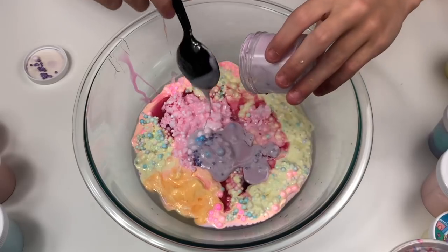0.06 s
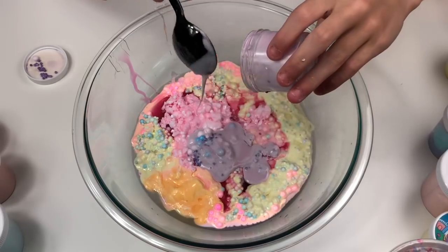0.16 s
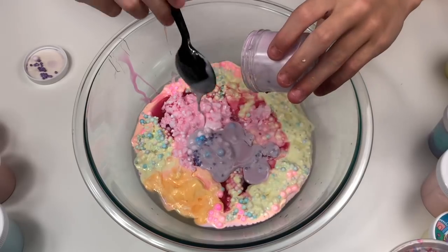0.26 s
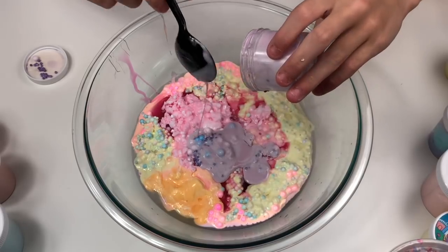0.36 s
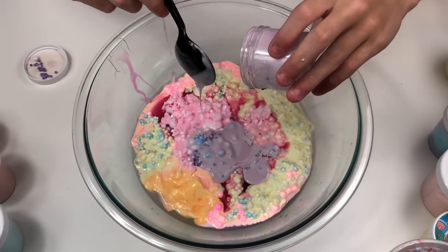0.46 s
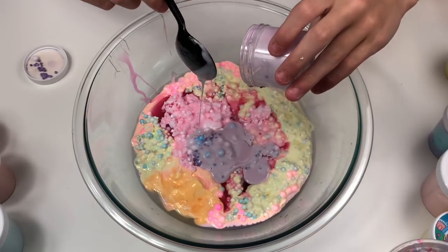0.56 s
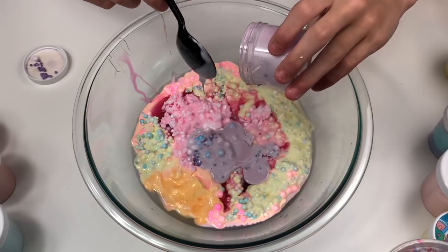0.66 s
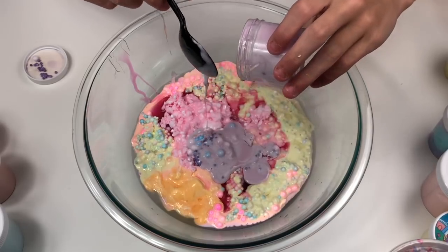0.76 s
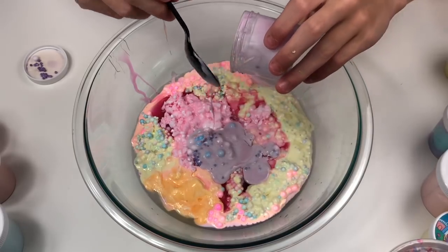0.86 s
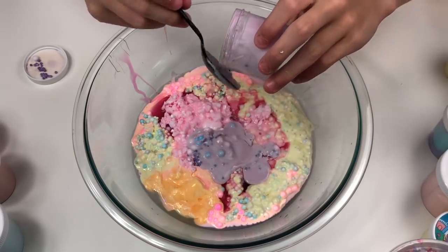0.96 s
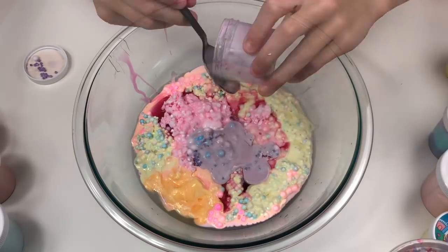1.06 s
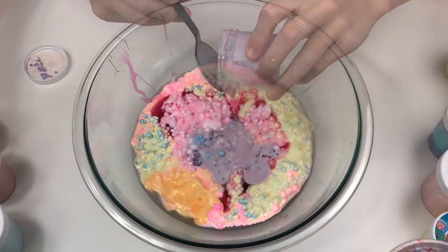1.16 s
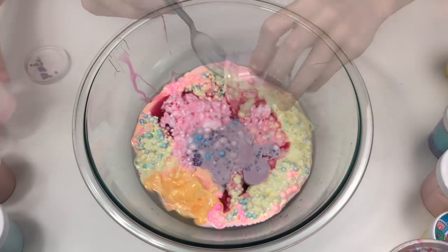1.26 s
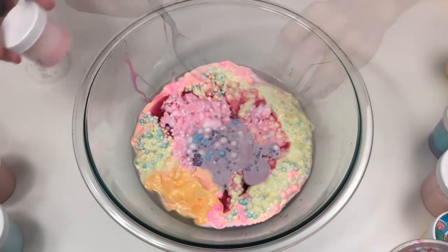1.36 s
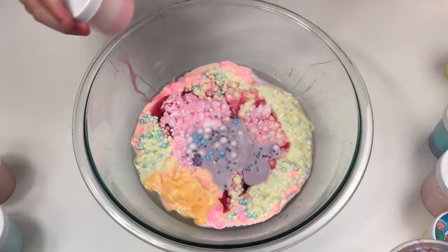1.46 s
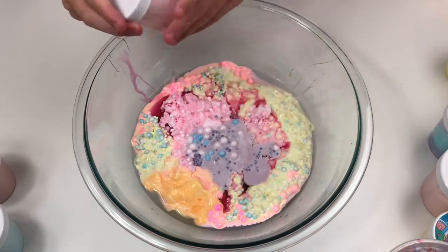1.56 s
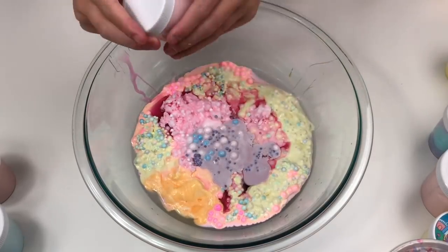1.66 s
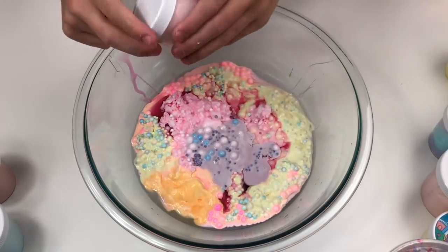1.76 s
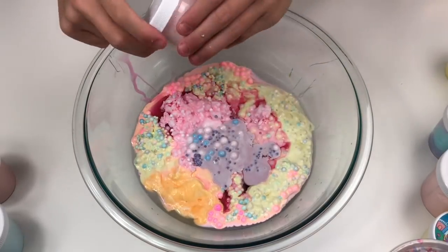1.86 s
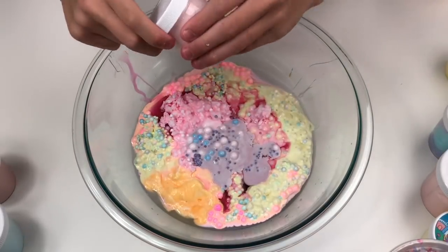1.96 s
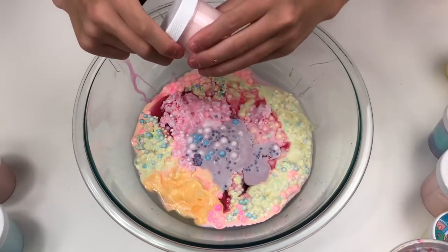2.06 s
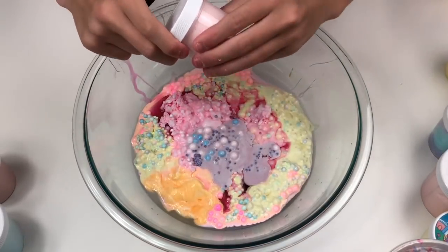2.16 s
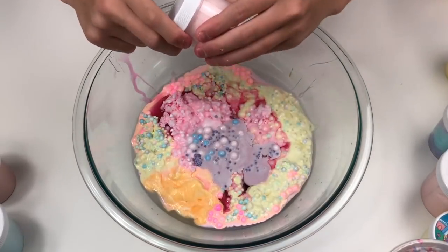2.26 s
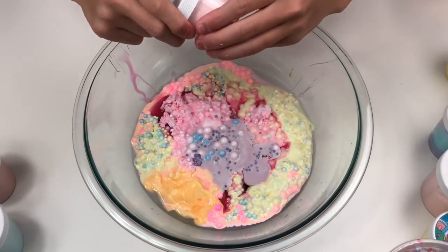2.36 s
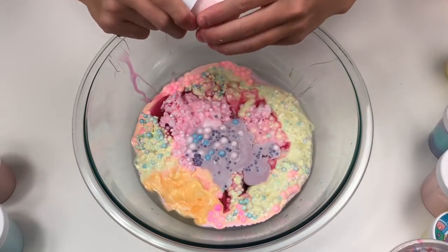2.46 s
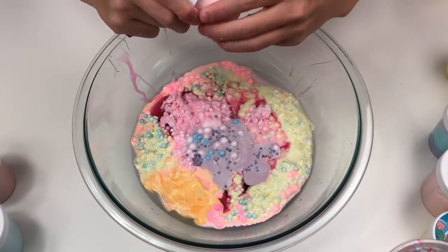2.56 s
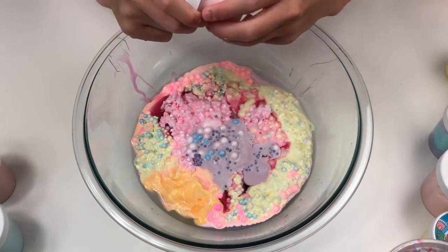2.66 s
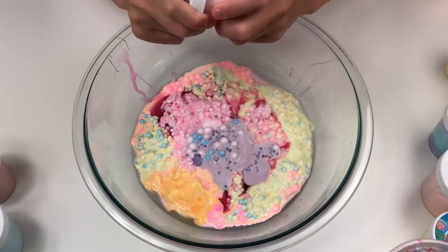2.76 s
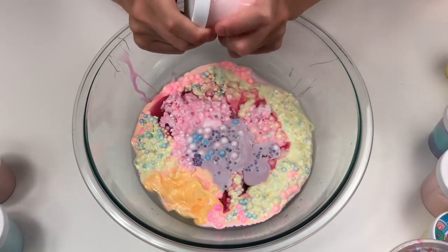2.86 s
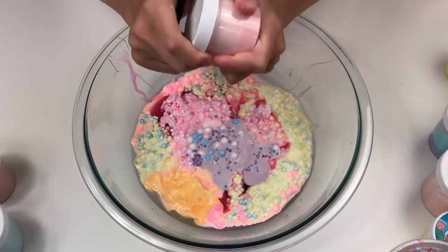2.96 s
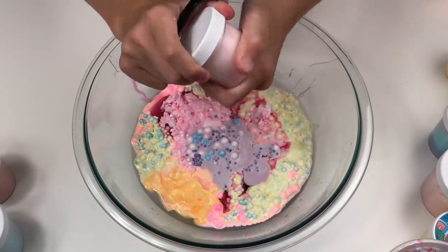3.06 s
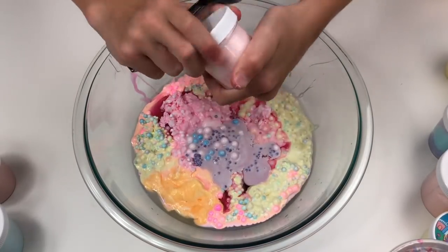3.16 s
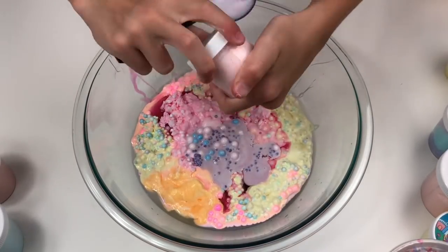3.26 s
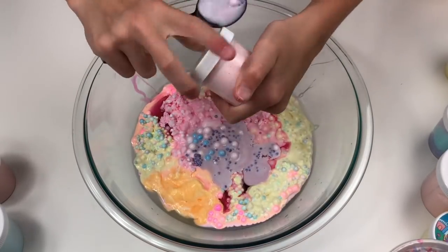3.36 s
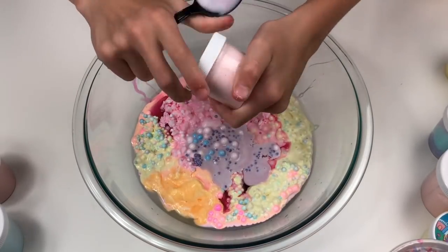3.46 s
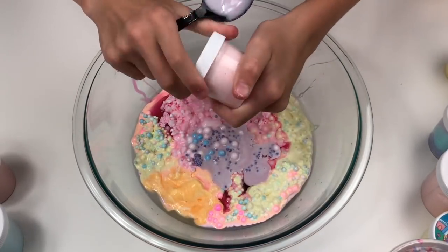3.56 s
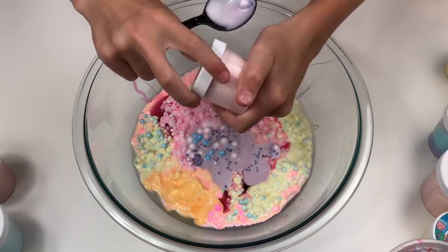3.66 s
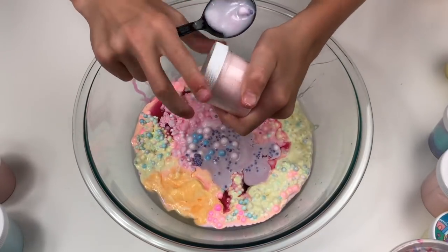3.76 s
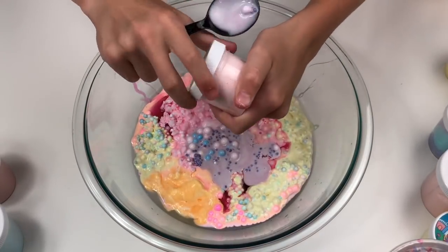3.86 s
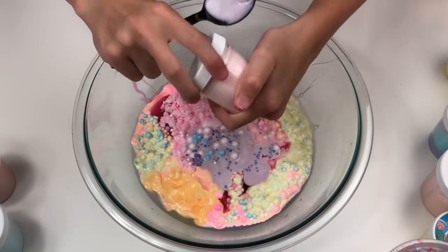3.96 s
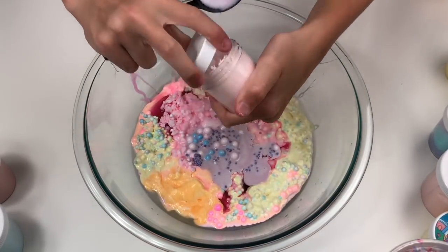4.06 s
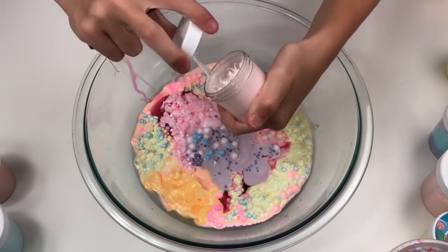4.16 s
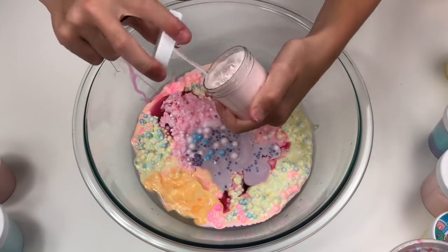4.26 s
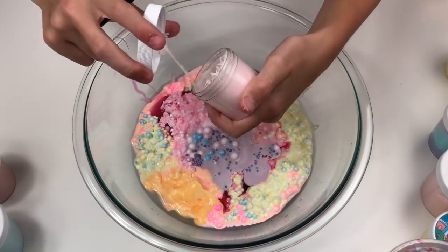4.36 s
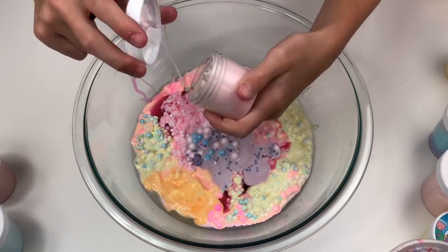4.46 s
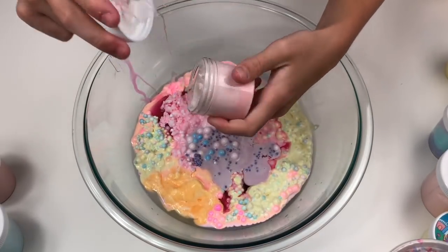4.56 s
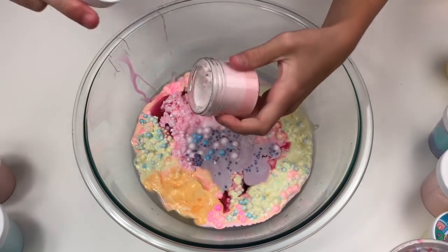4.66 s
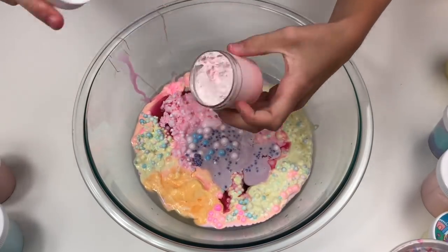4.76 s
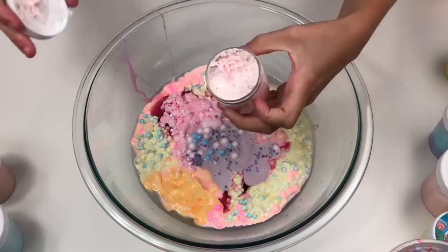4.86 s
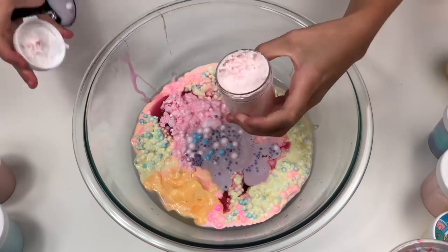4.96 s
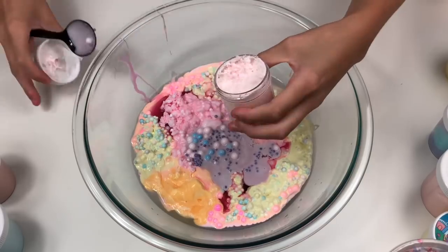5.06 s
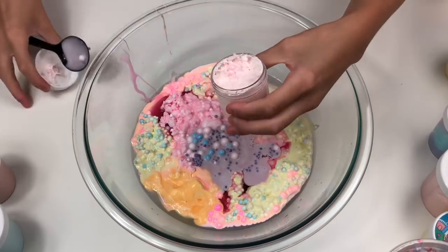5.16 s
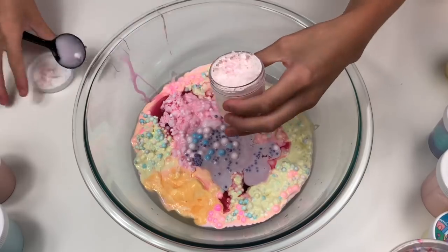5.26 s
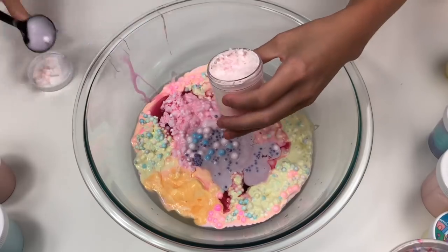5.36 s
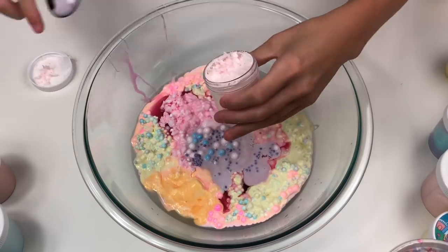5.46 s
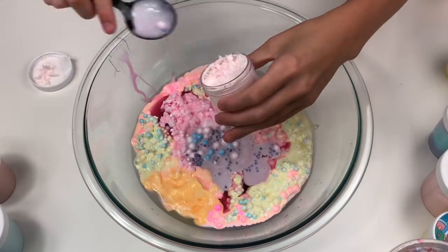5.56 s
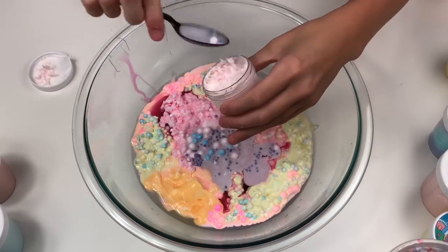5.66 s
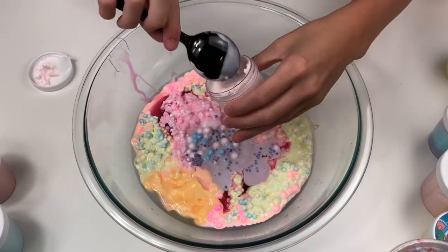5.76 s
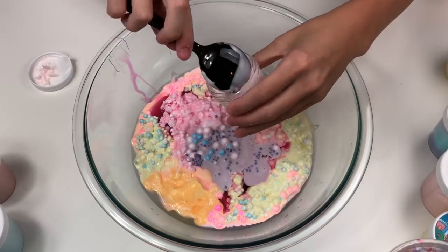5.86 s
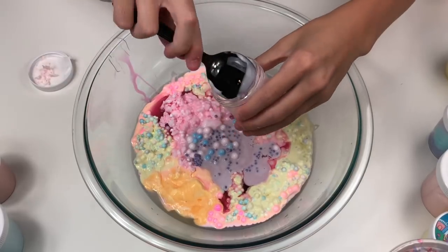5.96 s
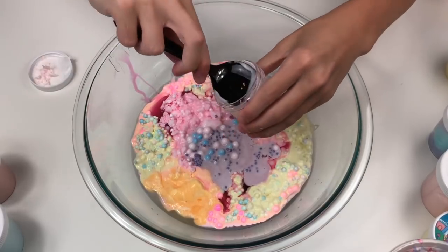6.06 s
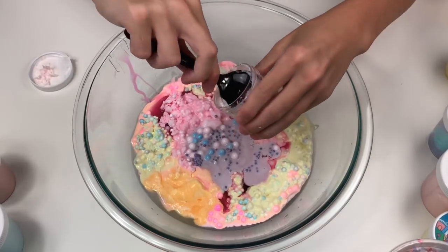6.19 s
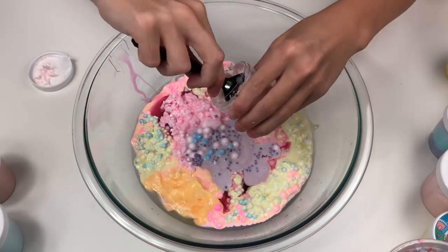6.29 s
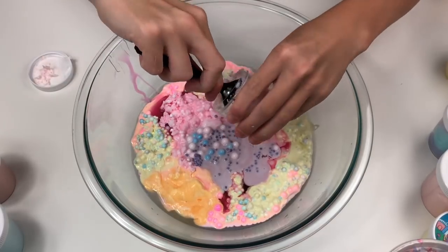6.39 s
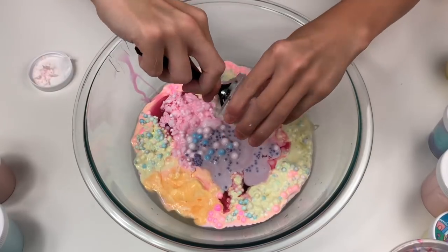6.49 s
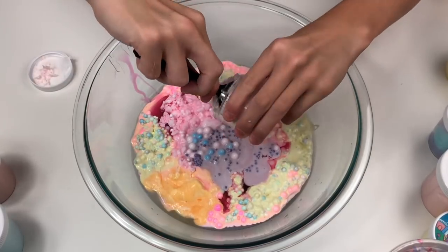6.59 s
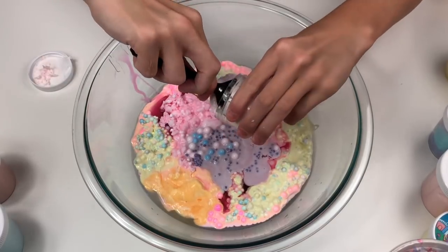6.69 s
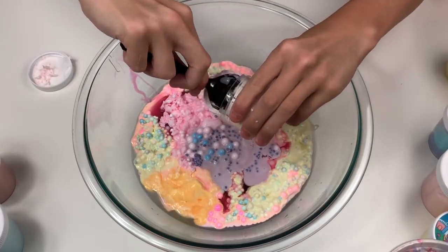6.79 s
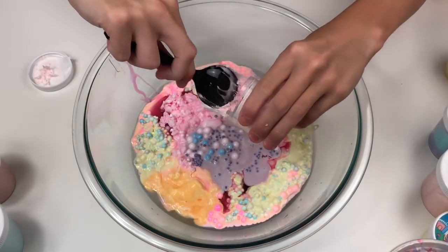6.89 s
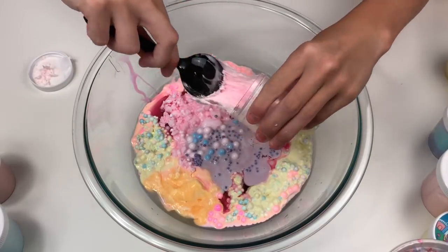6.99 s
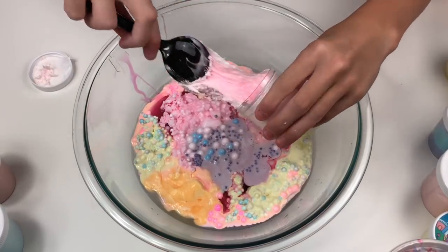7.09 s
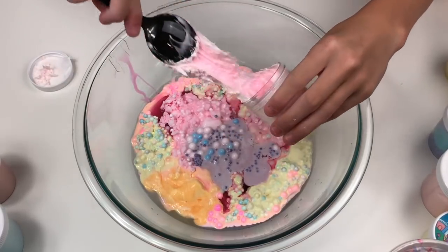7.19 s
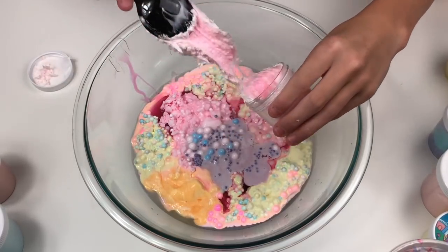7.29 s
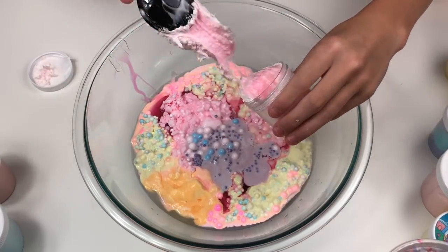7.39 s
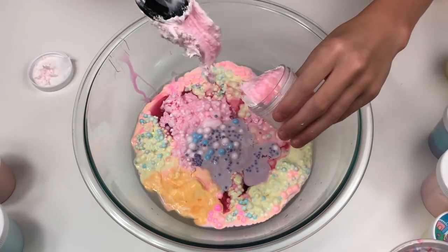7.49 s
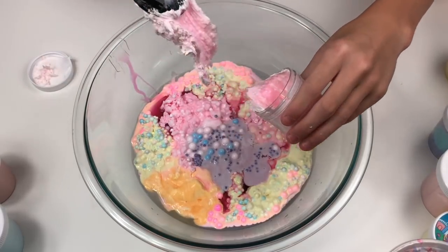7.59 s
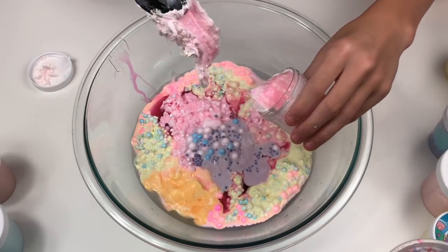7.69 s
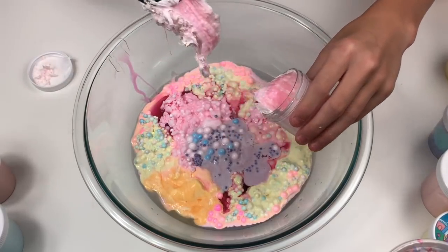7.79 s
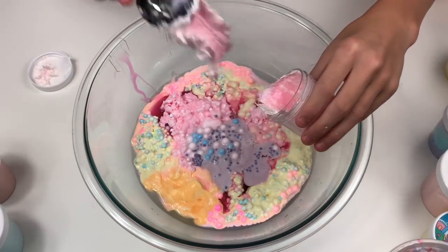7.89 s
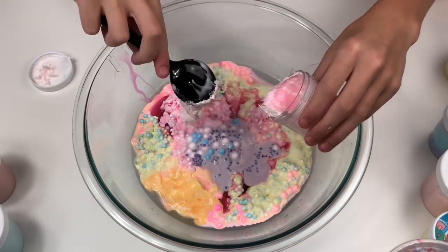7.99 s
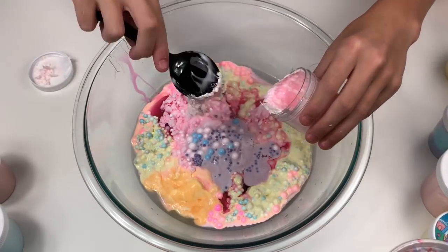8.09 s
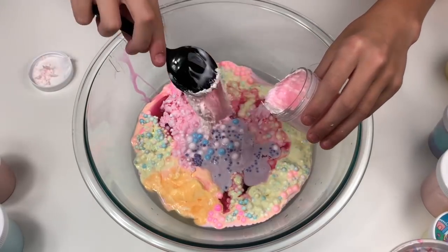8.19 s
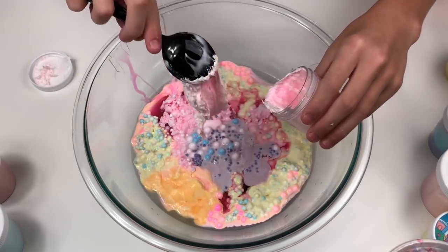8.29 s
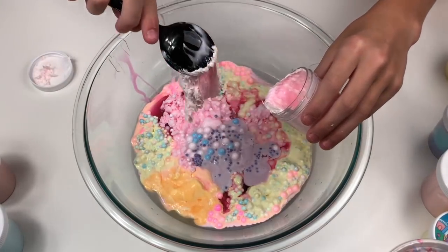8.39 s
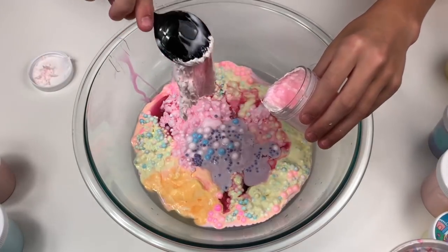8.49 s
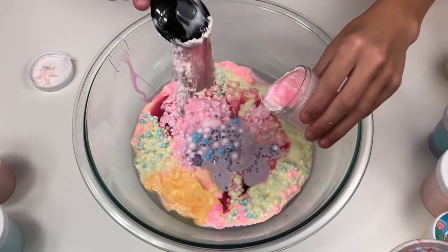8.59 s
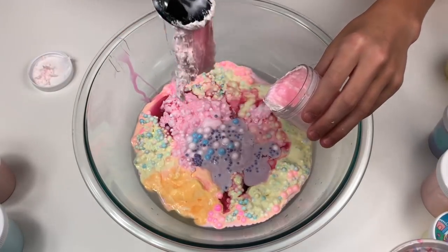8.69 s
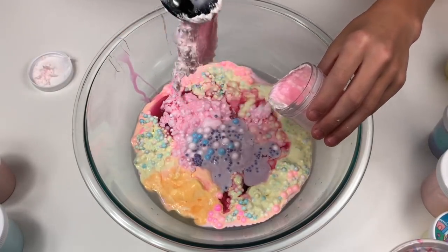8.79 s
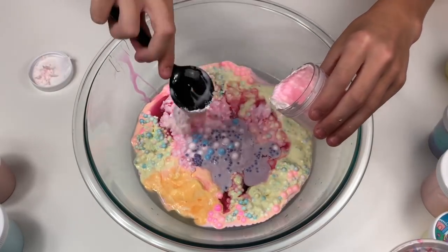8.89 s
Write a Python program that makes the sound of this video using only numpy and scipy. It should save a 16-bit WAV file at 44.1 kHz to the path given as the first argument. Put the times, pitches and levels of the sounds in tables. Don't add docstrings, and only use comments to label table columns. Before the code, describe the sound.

Close, quiet plastic taps and sharp lid snaps, rubbing threads, a lid dropping with two bounces, then wet slime popping, fizzing and hissing.

```python
import sys
import numpy as np
from scipy import signal
from scipy.fft import rfft, irfft
from scipy.io import wavfile
from scipy.ndimage import uniform_filter1d

SR = 44100
rng = np.random.default_rng(int(sys.argv[2]) if len(sys.argv) > 2 else 0)


def boost_factor(decibels):
    exponent = np.asarray(decibels, float) / 20
    return 10 ** exponent


def generate_wav(sig):
    pcm = np.round(np.clip(np.atleast_2d(sig).T, -1, 1) * 32767).astype(np.int16)
    wavfile.write(sys.argv[1], SR, pcm)


N = 394254
AGE = np.arange(6000) / SR


def rms_one(x):
    return x / np.sqrt(np.mean(x ** 2) + 1e-30)


def filtered(x, hz, kind="low", order=2):
    return signal.sosfilt(signal.butter(order, hz, kind, fs=SR, output="sos"), x)


def at_hz(points, hz):
    points = np.array(points)
    return np.interp(np.log(hz), np.log(points[:, 0]), points[:, 1])


def coloured(x, spectrum):
    hz = np.maximum(np.fft.rfftfreq(len(x), 1 / SR), 1)
    return rms_one(irfft(rfft(x) * boost_factor(at_hz(spectrum, hz)), len(x)))


def resonance(x, hz, width_hz):
    r = np.exp(-np.pi * width_hz / SR)
    poles = [1, -2 * r * np.cos(2 * np.pi * hz / SR), r * r]
    return signal.lfilter([(1 - r * r) / 2, 0, (r * r - 1) / 2], poles, x)


def twice_resonant(x, hz, width_hz):
    return resonance(resonance(x, hz, width_hz), hz, width_hz)


def grains(per_s, spread_db):
    sizes = boost_factor(spread_db * np.minimum(rng.exponential(1, N), 4)) * rng.standard_normal(N)
    return sizes * (rng.random(N) < per_s / SR)


def add(out, s, sound):
    at = round(s * SR)
    out[at:at + len(sound)] += sound[:N - at]


def strokes(rows):
    s, peak_db, rise, fall = np.transpose([row[:4] for row in rows])[:, :, None]
    since = np.arange(0, N, 32) / SR - s
    return boost_factor(peak_db + 20 * np.minimum(since / rise, -since / fall))


def joined(gains):
    return np.interp(np.arange(N) / 32, np.arange(gains.shape[1]), gains.sum(axis=0))


def crack(noise, hz, t60, width, flat_db, spike):
    burst = noise * boost_factor(-60 * AGE / t60) * (1 - np.exp(-AGE / (0.0037 * t60)))
    burst[1] += spike
    base = filtered(burst, 2400, "high")
    sound = resonance(base, hz, width * hz) + boost_factor(flat_db) * base
    return sound / np.max(np.abs(sound))


def blows(events, modes, spread_db, rise_s, flat_db, crack_t60, ring, split_hz=1000, swell_cycles=1e-6):
    out = np.zeros(N)
    hz, db, t60 = np.transpose(modes)[:, :, None]
    signs = (-1.) ** np.arange(len(modes))[:, None]
    rings = signs * np.sin(2 * np.pi * hz * AGE) * boost_factor(db - 60 * AGE / (ring * t60))
    rings *= 1 - np.exp(-AGE / rise_s)
    rings *= np.minimum(AGE * hz / swell_cycles, 1) ** 2
    is_low = hz[:, 0] < split_hz
    for s, peak_db, crack_db, crack_hz, low_db in events:
        strengths_db = spread_db * rng.standard_normal(len(modes)) + low_db * is_low
        body = boost_factor(strengths_db) @ rings
        body = body / np.max(np.abs(body))
        noise = rng.standard_normal(len(AGE))
        edge = boost_factor(crack_db) * crack(noise, crack_hz, crack_t60, 0.451, flat_db, spike=3.934)
        add(out, s, boost_factor(peak_db) * (body + edge))
    return out


def snaps(events, width, flat_db, gain_db, spike):
    out = np.zeros(N)
    for s, peak_db, hz, t60, dull_db in events:
        bright, dull = rng.standard_normal((2, len(AGE)))
        push = twice_resonant(dull * boost_factor(-60 * AGE / (1.2 * t60)), 1100, 2600)
        sound = crack(bright, hz, t60, width, flat_db, spike) + boost_factor(dull_db) * push / np.max(np.abs(push))
        add(out, s, boost_factor(peak_db + gain_db) * sound)
    return out


def films(events, t60, dull_db, dull_db_per_octave):
    return [(s, db, hz, t60, dull_db + dull_db_per_octave * np.log2(hz / 6000)) for s, db, hz in events]


def pings(events, swell_cycles):
    out = np.zeros(N)
    for s, db, hz, t60 in events:
        swell = np.minimum(AGE * hz / swell_cycles, 1) ** 2
        add(out, s, boost_factor(db - 60 * AGE / t60) * swell * np.sin(2 * np.pi * hz * AGE))
    return out


# pitch_hz, width_hz, level_db
HUMS = [(64.5, 29, -4.5), (128.6, 34.3, -1.5), (188.6, 29, -8.5), (285, 81, -13)]


def rumble():
    out = np.zeros(N)
    lumps_db, lumps_per_s = 3, 4.7
    for hz, width_hz, db in HUMS:
        knots = rng.standard_normal(80)
        swell_db = lumps_db * np.interp(np.arange(N) / SR * lumps_per_s, np.arange(80), knots)
        out += boost_factor(db + swell_db) * rms_one(twice_resonant(rng.standard_normal(N), hz, width_hz))
    return boost_factor(-74.5) * out


# pitch_hz, level_db (per Hz)
FLOOR = [(18, -37.5), (56, -4.5), (189, -6.5), (551, -16), (966, -20.5), (2660, -27.5), (15780, -34.5),
         (15950, -60.5)]


def microphone_hiss():
    return boost_factor(-68) * coloured(rng.standard_normal(N), FLOOR)


# pitch_hz, t60_s, level_db
ROOM = [(255.1, 0.47, -0.5), (600, 0.29, -0.5), (1297, 0.24, -2), (3000, 0.29, -6), (6063, 0.28, -3.5),
        (14000, 0.089, -3.5)]


def room(x, shifts_hz):
    t, tails, gap_s = np.arange(SR // 2) / SR, 0, 0.0023
    strength = np.array(ROOM)[:, ::2]
    turn = 2 * np.pi * np.outer(shifts_hz, np.arange(N) / SR)
    copies = x * np.vstack([np.cos(turn), np.sin(turn)])
    edges = 120 * 2 ** np.arange(0, 7.3, .5)
    for low, high in zip(edges, edges[1:]):
        band = filtered(rng.standard_normal((len(copies), len(t))), [low, high], "band")
        hz = np.sqrt(low * high)
        tails = tails + band * boost_factor(at_hz(strength, hz) - 60 * t / at_hz(ROOM, hz))
    tails = tails * np.clip(t / gap_s, 0, 1) ** 2
    tails = tails / np.sqrt(np.sum(tails ** 2) / 2)
    return signal.fftconvolve(copies, tails, axes=1).sum(axis=0)[:N]


# start_s, peak_db, crack_db (over peak), crack_hz, low_modes_db
TAPS = [
    (1.2925, -57, -19, 3000, 6.5),
    (1.2985, -39, -20.5, 3500, 14),
    (1.3145, -10, -0.5, 3300, -1.5),
    (2.6996, -55.5, 9, 8250, -1),
]
# pitch_hz, level_db, t60_s
EMPTY_JAR = [(740, -32, 0.024), (1262, 0, .028), (1385, 0, .028), (1980, -9.5, 0.012), (2660, -22, 0.03),
             (3869, -16.5, .012), (4500, -20.5, 0.014), (6700, -19.5, 0.012), (7700, -22, 0.012),
             (9500, -18.5, 0.016)]
# start_s, peak_db, crack_db (over peak), crack_hz, low_modes_db
FIRST_TAP = [
    (1.0828, -28, -4, 6407, 0),
]
# pitch_hz, level_db, t60_s
JAR_THREADS = [(1307.4, 1, 0.027), (1420, -6, 0.023), (2500, -15, .012), (3900, -3.5, 0.012),
               (4555, -17.5, 0.025), (5900, -7, .012), (6900, -15, 0.023), (7750, -12, 0.015),
               (9000, -35, 0.0104)]


def spoon_taps():
    taps = blows(TAPS, EMPTY_JAR, spread_db=7.5, rise_s=0.00063, flat_db=-7.5, crack_t60=0.022,
                 ring=1.0, split_hz=1700)
    return taps + blows(FIRST_TAP, JAR_THREADS, spread_db=2.6, rise_s=0.0005, flat_db=-9,
                        crack_t60=.018, ring=1.0)


# start_s, level_db, overtone_db
AFTER_RINGS = [
    (1.0829, -51.5, -25),
    (1.316, -36.5, 0.5),
]
# pitch_hz, level_db, t60_s
JAR_AIR = [(1400, -1.5, 0.25), (1380, -5.5, .24), (1442, -12.5, .18), (1290, -5, .18), (1316, -12, .14),
           (1207, -10.5, .14), (1165, -15, .14), (2677, -3, 0.089)]


def jar_air():
    out, age = np.zeros(N), np.arange(SR // 3) / SR
    for s, db, overtone_db in AFTER_RINGS:
        tones = 0
        for k, (hz, tone_db, t60) in enumerate(JAR_AIR):
            gain = boost_factor(tone_db + overtone_db * (hz > 2000) - 60 * age / t60)
            tones = tones + gain * np.sin(2 * np.pi * hz * age + k * k)
        add(out, s, boost_factor(db) * tones * (1 - np.exp(-age / 0.0036)))
    return out


# start_s, peak_db, pitch_hz, t60_s, dull_db
SNAPS = [
    (0.7945, -48.5, 3640, 0.089, -8),
    (1.8386, -30, 7500, 0.056, -15),
    (1.8734, -23.5, 7000, 0.03, -29),
    (1.9073, -31, 6000, 0.026, -26),
]
# start_s, peak_db, pitch_hz, t60_s, dull_db
SEAL = [
    (2.0633, -20.5, 5000, 0.016, -28),
    (2.0642, -22.5, 14000, 0.019, -31.5),
]
# start_s, peak_db, pitch_hz
TICKS = [(2.3437, -59, 4210), (2.376, -52, 4830), (2.539, -54, 7000), (2.5592, -48, 7560),
         (2.6274, -48, 14500), (2.79, -55, 7100), (2.9557, -63, 3240), (2.9726, -55, 7960),
         (3.452, -57, 3370), (3.7867, -66, 5270), (3.855, -62, 11100), (4.1679, -51.5, 2660),
         (4.235, -58, 11200), (4.4204, -58, 3780), (4.6495, -46.5, 14000), (4.722, -55, 7750),
         (4.6445, -58, 14000), (4.9387, -47.5, 14950)]


def fingers_and_seal():
    out = snaps(SNAPS, width=0.22, flat_db=2.0, gain_db=-1.5, spike=0.5)
    out += snaps(SEAL, width=0.5, flat_db=-5.0, gain_db=1.0, spike=4.4)
    ticks = films(TICKS, t60=0.019, dull_db=-31.0, dull_db_per_octave=6.0)
    return out + snaps(ticks, width=0.25, flat_db=-16.5, gain_db=-1.0, spike=0.5)


# start_s, peak_db, crack_db (over peak), crack_hz, low_modes_db
LID_POPS = [
    (1.8734, -26.5, -5, 4100, 0),
    (1.8795, -37, -12, 4000, -1),
    (1.893, -49, -15, 3100, -20),
]
# pitch_hz, level_db, t60_s
LID_TOP = [(1160, -1.5, 0.024), (1440, -10, 0.029), (1700, -3, 0.037), (2600, 3, 0.028), (3200, -1, 0.047),
           (4010, -7, 0.022), (4870, -1, 0.022), (6140, -8, .015)]


def lid_pops():
    return blows(LID_POPS, LID_TOP, spread_db=1.5, rise_s=0.00047, flat_db=-8, crack_t60=0.026,
                 ring=0.83, split_hz=2000)


# start_s, peak_db, crack_db (over peak), crack_hz, low_modes_db
KNOCKS = [(3.271, -44, 1, 4520, -9), (3.325, -35.5, -15, 3350, 5.5), (3.344, -47, -1, 3000, -3),
          (3.368, -48, -3, 2740, -20), (3.599, -36, -19, 4430, 2), (3.688, -43.5, -6, 5280, 1),
          (3.735, -50, -3, 3500, 8), (3.772, -58.5, -14, 4500, 15), (3.987, -40, -12, 3220, 11),
          (4.042, -35, -5, 4530, -4), (4.057, -42, 6, 5100, -17), (4.0665, -30, -6.5, 5700, -0.5),
          (4.0785, -44, -23, 4400, -16), (4.073, -36.5, -20, 4400, -12), (4.083, -40, -20, 4400, -21),
          (4.180, -53, 0, 2600, -5)]
# pitch_hz, level_db, t60_s
FULL_JAR = [(300, -12, 0.034), (595, 1, 0.019), (975.5, -12.5, .02), (1178, 1.5, 0.014), (1430, 4.5, 0.02),
            (1735, -4.5, 0.026), (2106, -13.5, 0.015), (3343, -18, 0.015)]
# start_s, peak_db, crack_db (over peak), crack_hz, low_modes_db
RIM_KNOCKS = [
    (3.471, -41.5, -13, 3180, -3),
    (3.590, -36, -2.5, 4580, -0.5),
    (3.944, -34.5, -15, 3060, 1),
    (4.049, -45, -8, 3000, 7),
    (4.215, -58, 2, 3000, -11),
]
# pitch_hz, level_db, t60_s
RIM = [(400, -13, .02), (620, -3, .026), (1450, -5, .014), (1620, -3, .016), (1800, 0, .017),
       (2150, -9, .012), (3300, -14, .01)]
# start_s, peak_db, crack_db (over peak), crack_hz, low_modes_db
LID_RINGS = [
    (1.8386, -34.5, -12, 5000, -2.5),
    (1.853, -55, -10, 3700, -5),
    (1.9073, -39, -8, 4500, -9),
]
# pitch_hz, level_db, t60_s
LID_SHELL = [(1480, -11, 0.016), (1770, -14, 0.077), (2230, 2, 0.032), (3300, -4, 0.028), (3750, -13, .06),
             (4220, -8, 0.059), (5170, -3, .02)]


def lid_knocks():
    out = blows(KNOCKS, FULL_JAR, spread_db=3.0, rise_s=0.0015, flat_db=-4, crack_t60=0.019,
                ring=0.99, swell_cycles=1.25)
    out += blows(RIM_KNOCKS, RIM, spread_db=0.5, rise_s=0.0012, flat_db=-20, crack_t60=0.027,
                 ring=0.99, swell_cycles=1.2)
    return out + blows(LID_RINGS, LID_SHELL, spread_db=2.0, rise_s=0.00039, flat_db=-18,
                       crack_t60=0.025, ring=1.0, split_hz=2000)


# pitch_hz, level_db (per Hz)
RUB_COLOUR = [(880, -32.5), (1500, -8), (2400, -8.5), (2770, -8.5), (5500, -8.5), (15100, -13),
              (15700, -13), (16100, -40)]
# peak_s, hiss_db, rise_s, fall_s
# (times for 20 dB)
BRUSHES = [(1.478, -74.5, 0.021, 0.058), (1.526, -81, 0.036, 0.075), (1.74, -69.5, .3, 0.27),
           (1.848, -49.5, 0.0091, 0.099), (1.925, -56.5, 0.018, 0.076), (2.374, -70, 0.067, 0.093),
           (2.546, -70.5, 0.024, 0.27), (2.846, -71.5, 0.17, 0.11), (4.224, -72.5, 0.18, 0.17),
           (4.422, -69.5, 0.018, 0.048), (4.66, -71, 0.032, 0.13), (8.395, -71, .04, .08),
           (4.96, -70.5, 0.099, .04), (5.58, -63.5, 0.042, 0.1), (5.83, -75, 0.077, 0.24),
           (7.426, -69.5, 0.008, 0.11)]
# peak_s, hiss_db, rise_s, fall_s, jar_hum_db (over hiss)
TURNS = [(3.049, -55.5, 0.021, 0.04, -4.5), (3.086, -62.5, 0.033, 0.059, -2),
         (3.12, -59.5, 0.044, 0.038, -14), (3.148, -59.5, 0.014, 0.069, -7), (3.166, -56, 0.039, 0.027, -5),
         (3.24, -66, 0.058, .06, 2), (3.275, -58.5, 0.064, 0.056, 1.5), (3.315, -61.5, 0.046, 0.057, 6.5),
         (3.355, -66, 0.054, 0.055, -5), (3.388, -70, .04, .02, 2), (3.452, -76.5, 0.038, 0.0084, 17.5),
         (3.64, -77, 0.088, 0.07, 14), (3.693, -53, 0.022, 0.069, -8), (3.75, -81, 0.03, 0.026, 16),
         (4.047, -51.5, 0.024, 0.034, 6), (4.1, -61.5, 0.026, 0.058, -20)]
# peak_s, level_db, rise_s, fall_s
BINDS = [
    (3.05, -56.5, .015, 0.029),
    (3.1, -69, 0.045, .06),
    (3.162, -56, 0.044, 0.027),
    (3.272, -64, 0.047, 0.027),
    (3.31, -69, .04, 0.066),
]


def rubbing():
    hiss = coloured(grains(per_s=22000, spread_db=1.5), RUB_COLOUR)
    scuff = rms_one(twice_resonant(hiss[::-1], 4800, 2500))
    slips = filtered(grains(per_s=2700, spread_db=1.0), 2200)
    hum = sum(boost_factor(db) * resonance(slips, hz, 4.8 / t60) for hz, db, t60 in FULL_JAR)
    brushes, turns = joined(strokes(BRUSHES)), strokes(TURNS)
    pressed = boost_factor(-8.5) * brushes + joined(turns * boost_factor(np.array(TURNS)[:, 4:]))
    out = (brushes + joined(turns)) * hiss
    out += joined(strokes(BINDS)) * scuff
    return out + boost_factor(-1.5) * pressed * rms_one(hum)


# start_s, peak_db, crack_db (over peak), crack_hz, low_modes_db
DROPS = [
    (5.2362, -16.5, -7.5, 2780, -3),
    (5.3755, -20, -4.5, 3560, -3.5),
    (5.4288, -21, -2, 4500, -8),
]


def clatter():
    out = np.zeros(N)
    for s, peak_db, crack_db, crack_hz, _ in DROPS:
        noise = rng.standard_normal(len(AGE))
        rattle = noise * boost_factor(-60 * AGE / 0.032) * (1 - np.exp(-AGE / 0.00063))
        dull = twice_resonant(rattle, 1450, 1500)
        bright = twice_resonant(rattle, 0.32 * crack_hz, 3040)
        add(out, s, boost_factor(peak_db + 2.5) * (dull + boost_factor(crack_db - 15.0) * bright))
    return out


# pitch_hz, level_db, t60_s
LID_ON_TABLE = [(204, -20.5, 0.097), (326, -26, 0.0571), (550, 6.5, 0.04), (710, -14, 0.027),
                (830, -3, 0.023), (955, -9, 0.041), (1114, -6, 0.027), (1392, -3.5, 0.031),
                (1608, -3.5, 0.039), (1700, -16, 0.031), (1961, -2, 0.028), (2330, -16, 0.02)]
# pitch_hz, level_db, t60_s
LID_EDGE = [(188, -13, 0.21), (343, -19, 0.21), (580, 16, 0.022), (875, -9, 0.024), (1250, -11, 0.025),
            (1850, -12, 0.058), (2210, -8.5, 0.048), (2600, -11, 0.018), (3000, 4, 0.018),
            (3370, -8, 0.019), (3840, 0, 0.028), (4460, 0, 0.014)]
# start_s, peak_db, pitch_hz, t60_s
ROCKS = [
    (5.3765, -36.5, 7530, .012),
    (5.378, -18, 667, 0.011),
    (5.379, -30.5, 270, 0.044),
    (5.4295, -26, 7700, 0.0076),
    (5.4305, -30, 5940, 0.0061),
    (5.4312, -28, 3730, 0.011),
    (5.432, -39, 298, 0.046),
    (5.378, -29.5, 1290, 0.021),
]


def lid_drop():
    out = blows(DROPS[:1], LID_ON_TABLE, spread_db=1.8, rise_s=0.00094, flat_db=-57, crack_t60=0.015,
                ring=0.81, swell_cycles=1.72)
    out += blows(DROPS[1:], LID_EDGE, spread_db=1.0, rise_s=0.0017, flat_db=-28, crack_t60=0.018,
                 ring=0.55, swell_cycles=2.97)
    return out + clatter() + pings(ROCKS, swell_cycles=1.78)


# start_s, peak_db, crack_db (over peak), crack_hz, low_modes_db
SPOON_ON_RIM = [
    (6.5435, -68, 19, 12300, -9),
    (6.5465, -29.5, -8.5, 3300, -5),
]
# pitch_hz, level_db, t60_s
WET_RIM = [(596, -3, 0.013), (1310, -5, 0.011), (1830, 2.5, 0.019), (2180, -14, 0.011), (3300, 0, 0.0053)]


def spoon_on_rim():
    return blows(SPOON_ON_RIM, WET_RIM, spread_db=1.0, rise_s=0.00023, flat_db=-14, crack_t60=0.025, ring=0.99)


# peak_s, haze_db, rise_s, fall_s, hollow_note_db (over haze)
WIPES = [
    (1.179, -68, 0.012, 0.012, 2),
    (1.198, -63, 0.02, 0.02, 4),
    (1.213, -65, 0.015, 0.023, 6),
    (1.231, -74, 0.037, .03, -8),
    (1.259, -67, .012, 0.018, 2),
    (7.15, -87.5, .05, 0.065, 15),
    (7.45, -84.5, .03, .05, 9),
    (8.1, -79, .04, .05, 8.5),
    (6.52, -69, 0.046, 0.061, -11.5),
]


def wiping():
    haze = twice_resonant(grains(per_s=5000, spread_db=2.0), 1900, 1100)
    hollow = twice_resonant(rng.standard_normal(N), 465, 220)
    share = 0.97
    notes = [(s, db + note_db, share * rise, share * fall) for s, db, rise, fall, note_db in WIPES]
    return joined(strokes(WIPES)) * rms_one(haze) + joined(strokes(notes)) * rms_one(hollow)


# peak_s, level_db, pitch_hz, fall_s, half_width_hz
SQUEEZES = [(1.476, -67.5, 9550, 0.06, 1100), (4.657, -66, 7270, 0.08, 1000), (4.66, -68, 9800, 0.079, 500),
            (6.255, -66, 3900, 0.14, 450), (6.33, -76, 3670, 0.14, 450), (6.694, -66.5, 4174, 0.059, 450),
            (6.912, -71, 7000, 0.06, 600), (6.961, -70, 4190, 0.035, 450), (7.17, -72, 1900, 0.062, 400),
            (7.39, -76, 7600, .05, 600), (7.425, -68.5, 2060, 0.042, 249), (7.425, -73, 7700, .05, 500),
            (7.425, -75, 10000, .05, 500), (7.458, -73, 13500, .06, 900), (8.371, -71, 7370, 0.036, 500),
            (8.394, -61, 7070, 0.068, 600), (8.398, -76, 1890, .05, 400), (8.398, -71, 4390, .04, 502),
            (8.631, -76.5, 7200, 0.1, 700)]


def squeezed_air():
    out = np.zeros(N)
    since = np.arange(-2000, 12000) / SR
    rise_s, sag_hz_per_s = .007, 4900
    for s, db, hz, fall, width_hz in SQUEEZES:
        a, b = rms_one(filtered(rng.standard_normal((2, len(since))), width_hz))
        phase = 2 * np.pi * np.cumsum(hz - sag_hz_per_s * np.clip(since, 0, 0.15)) / SR
        gain = boost_factor(db + 20 * np.minimum(since / rise_s, -since / fall))
        add(out, s + since[0], gain * (a * np.cos(phase) + b * np.sin(phase)))
    return out


# time_s, hiss_db, tilt_db (raises the bright part, lowers the wet band)
SLIDES = [
    [(5.97, -93, 6.5), (6.054, -58, 0), (6.19, -86, -3), (6.22, -69, 13), (6.35, -57, 0), (6.45, -71, 4),
     (6.63, -80, 13), (7.18, -81, 16), (7.27, -82, 4)],
    [(7.3, -82, 6.5), (7.6, -93, 9)],
    [(7.95, -76, 0.5), (8.2, -71, -2)],
]


def slide_curve(column, outside):
    out = np.full(N, float(outside))
    for rows in SLIDES:
        rows = np.array(rows)
        at = np.arange(int(rows[0, 0] * SR), min(int(rows[-1, 0] * SR), N))
        out[at] = np.interp(at / SR, rows[:, 0], rows[:, column])
    return out


def slime_fizz():
    fizz = grains(per_s=780, spread_db=1.0) + .5 * rng.standard_normal(N)
    broad = filtered(fizz, [2600, 7000], "band")
    dull = rms_one(broad + 1.2 * resonance(broad, 3400, 900))
    bright = rms_one(filtered(fizz, 7000, "high"))
    tilt = boost_factor(slide_curve(column=2, outside=0))
    gain = uniform_filter1d(boost_factor(slide_curve(column=1, outside=-140)), size=300)
    return boost_factor(-10.5) * gain * (dull / tilt + bright * tilt)


def crackle():
    when, size, pitch = rng.random((55, 3)).T
    low_hz, high_hz = 5000, 15000
    return zip(6.0 + 1.22 * when, -53.5 - 7 * np.sqrt(size), low_hz * (high_hz / low_hz) ** pitch)


# start_s, peak_db, pitch_hz
DIG_POPS = [(5.9526, -56, 8390), (5.9959, -35.5, 3320), (6.0164, -44, 3450), (6.0578, -28.5, 7940),
            (6.0975, -30.5, 10000), (6.1067, -54, 3020), (6.1545, -33.5, 12400), (6.2104, -36.5, 12500),
            (6.22, -43, 4760), (6.2354, -46, 3480), (6.2467, -35.5, 3470), (6.2544, -39, 3670),
            (6.2622, -34.5, 14500), (6.2857, -44, 3640), (6.294, -39, 9300), (6.3, -47, 3650),
            (6.3107, -47, 5290), (6.347, -47, 9380), (6.3726, -47, 3450), (6.4237, -43, 12400),
            (6.4702, -49, 9720), (6.523, -43.5, 8300)]
# start_s, peak_db, pitch_hz
PULL_POPS = [(6.5665, -40.5, 7550), (6.5787, -39, 13330), (6.6074, -46, 12700), (6.6189, -47, 8600),
             (6.6583, -48, 11500), (6.697, -41.5, 13900), (6.773, -54, 9540), (6.805, -41, 13570),
             (6.817, -46, 9880), (6.8463, -58, 14000), (6.8683, -57, 12200), (6.8984, -45, 14000),
             (6.9162, -55.5, 6950), (6.9407, -44, 11800), (7.007, -57, 12800), (7.0293, -39.5, 14000),
             (7.0457, -42, 6700), (7.0757, -45, 6650), (7.084, -55, 4750), (7.143, -44, 12850),
             (7.193, -49, 12300), (7.209, -48, 6330), (8.0145, -55, 9710), (8.051, -53.5, 7000),
             (8.0721, -53, 12000), (8.093, -44.5, 12480), (8.3865, -54, 12000)]
# start_s, peak_db, pitch_hz
FINE_POPS = [(6.0294, -54, 9000), (6.046, -48, 6000), (6.0883, -50, 12100), (6.1214, -48, 14000),
             (6.139, -52, 8000), (6.1814, -54, 6100), (6.1894, -56, 9000), (6.203, -52, 12560),
             (6.228, -56, 14000), (6.3224, -46, 4840), (6.4144, -48, 3000), (6.6364, -50, 14540),
             (6.6878, -49, 3970), (6.71, -51, 12100), (6.7237, -48, 13900), (6.7444, -57.5, 14800),
             (6.756, -51, 9580), (6.7849, -51, 8500), (6.8204, -53, 9840), (6.8274, -49, 13540),
             (6.8544, -52, 15300), (6.8794, -56, 14400), (6.921, -46, 10500), (6.934, -46, 13900),
             (6.9444, -44, 14500), (6.9616, -56, 14000), (7.0107, -48, 14100), (7.0644, -50, 9860),
             (7.1097, -58, 12800), (7.122, -58, 12900), (7.1594, -54, 12000), (7.1867, -54, 13000),
             (7.2134, -52, 1700)]
# start_s, peak_db,
# pitch_hz, t60_s
PINGS = [(4.644, -57, 7400, .005), (4.6493, -43, 7300, 0.0072), (4.6495, -57, 9900, .005),
         (4.6655, -51, 7500, .007), (4.683, -61, 9700, .007), (4.718, -58, 14000, 0.0022),
         (4.7635, -60, 14300, .003), (7.084, -56, 4800, .006), (6.5965, -46, 8500, 0.0022),
         (8.3725, -60, 7600, .006), (8.3863, -36.5, 7300, .005), (8.433, -62, 13500, .002)]


def slime_pops():
    dig = films(DIG_POPS, t60=0.025, dull_db=-23, dull_db_per_octave=-5.5)
    pull = films(PULL_POPS, t60=0.023, dull_db=-32, dull_db_per_octave=-1.0)
    faint = films(crackle(), t60=0.022, dull_db=-22, dull_db_per_octave=-9)
    fine = films(FINE_POPS, t60=0.012, dull_db=-15.5, dull_db_per_octave=-4.5)
    out = snaps(dig, width=0.72, flat_db=-11.5, gain_db=0.5, spike=8.2)
    out += snaps(pull, width=0.65, flat_db=-8.0, gain_db=0.0, spike=8.2)
    out += snaps(faint, width=0.7, flat_db=-7, gain_db=1.5, spike=5.2)
    out += snaps(fine, width=0.46, flat_db=-1, gain_db=1.0, spike=6.9)
    return out + pings(PINGS, swell_cycles=2.5)


def scene():
    floor = microphone_hiss() + rumble()
    taps = spoon_taps() + jar_air()
    knocks, drops = lid_knocks(), lid_drop()
    close = fingers_and_seal() + lid_pops() + rubbing() + spoon_on_rim() + wiping()
    close += squeezed_air() + slime_fizz() + slime_pops()
    note = boost_factor(-8.5) * filtered(taps, 2000)
    tick = boost_factor(-5.0) * filtered(taps, 2200, "high")
    thin = boost_factor(6.5) * filtered(drops, 750, "high")
    diffuse = room(close + tick + thin, shifts_hz=[40, 105, 175])
    hollow = room(note + boost_factor(1.5) * knocks, shifts_hz=[18])
    sounds = taps + knocks + drops + close + boost_factor(-15) * (diffuse + hollow)
    sounds = filtered(sounds, 125, "high", order=3)
    return (sounds + floor)[None]


def band_limit(x):
    return signal.sosfilt(signal.butter(12, 17010, fs=SR, output="sos"), x)


def record(dry):
    top_cut = signal.cheby2(10, 40, 16700, fs=SR, output="sos")
    mix = signal.sosfilt(top_cut, dry)
    return band_limit(mix)


dry = scene()
out = record(dry)
generate_wav(out)
```